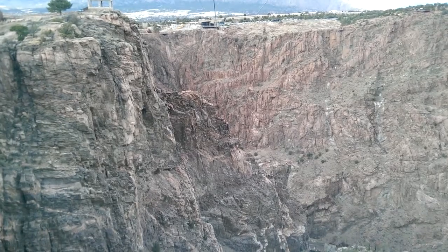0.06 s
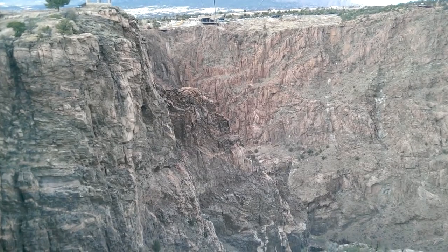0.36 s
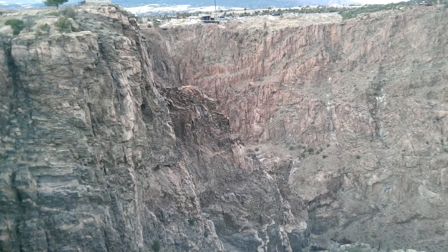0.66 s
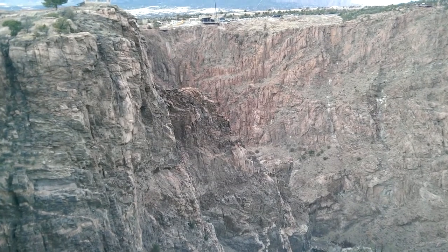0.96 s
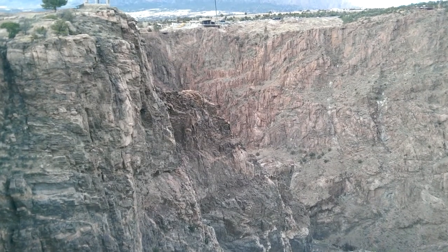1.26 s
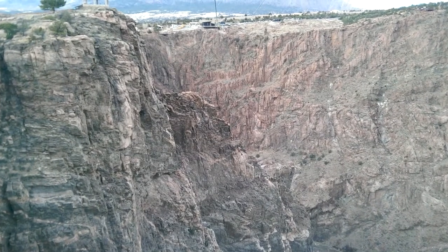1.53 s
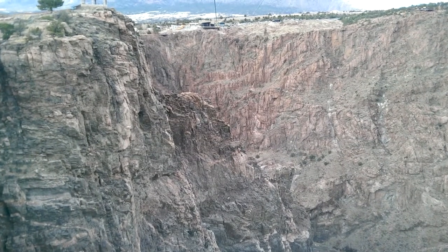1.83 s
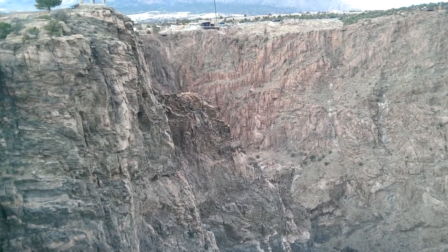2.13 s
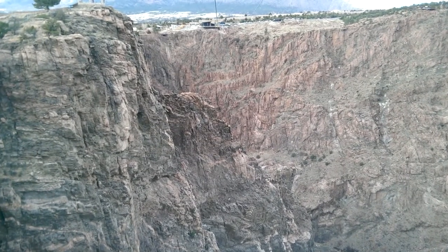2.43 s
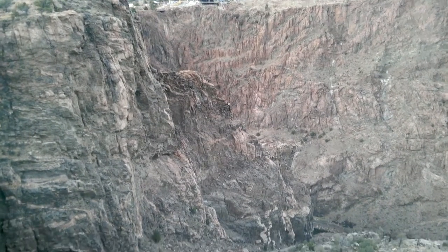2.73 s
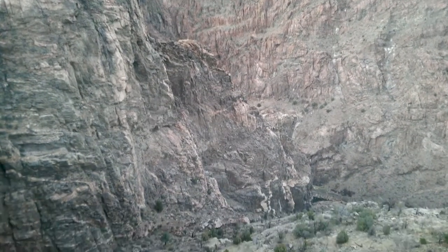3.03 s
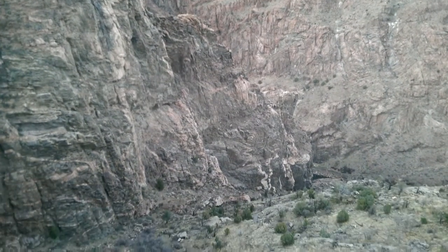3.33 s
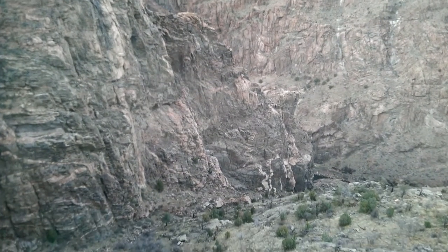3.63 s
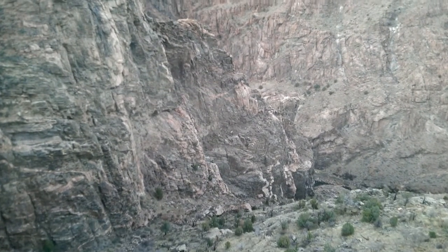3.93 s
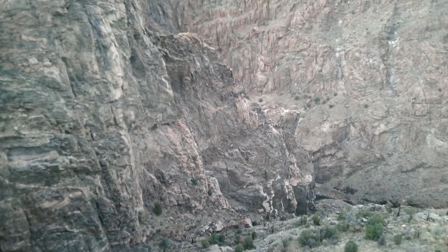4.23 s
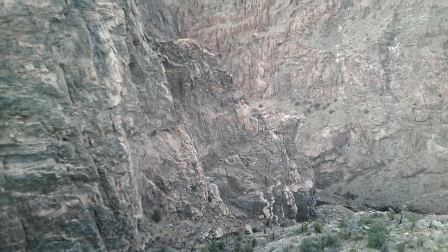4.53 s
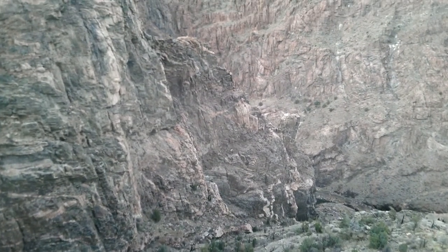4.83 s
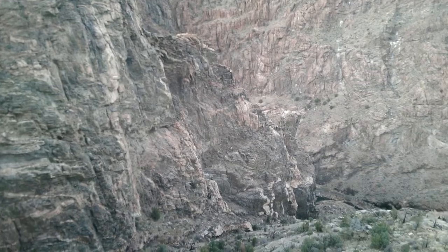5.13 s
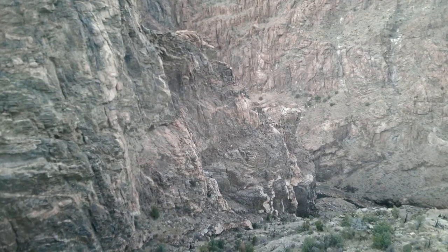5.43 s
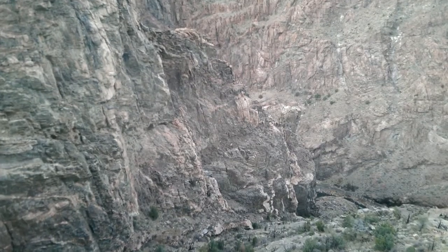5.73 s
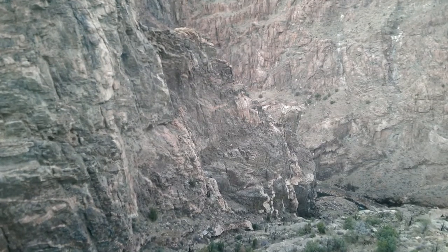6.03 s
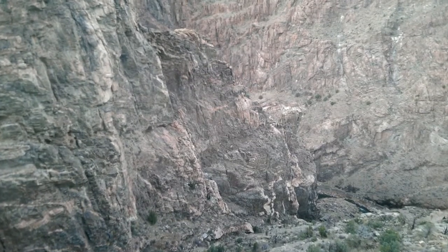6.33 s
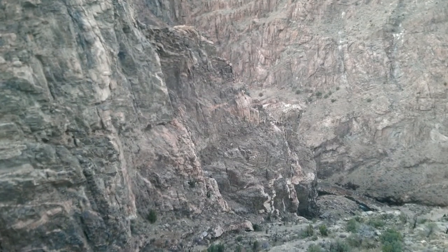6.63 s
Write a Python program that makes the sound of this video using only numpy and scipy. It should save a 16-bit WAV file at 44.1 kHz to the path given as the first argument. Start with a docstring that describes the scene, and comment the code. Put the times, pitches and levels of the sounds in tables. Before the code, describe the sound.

A low drone and rumble fill the inside of a moving cable gondola for about seven seconds, over a deep floor shudder and faint hiss. Close on the left, fingers tap the camera three times: a dull knock at 0.3 seconds and light clicks at 0.7 and 1.3. A sleeve slides in soft strokes through the first three seconds, with a quick swish near 2.6. The drone swells from about 1.5 seconds, is loudest around 2.5, sags and breaks off at 3.3, then continues as uneven throbs, roughly five a second. Small jolts make the cabin boom softly and its panels rumble, mostly between 1 and 4.5 seconds. The slightly metallic whirr of the running gear grows around 4 seconds and stays up. Brief soft scuffs come on the left, mostly between 2 and 4 seconds, with one more near the end.

```python
"""A cable gondola's drone, heard inside the cabin high over a canyon: the rope shakes the cabin near its
lowest air mode, which swells and then throbs. Jolts make the next air mode boom, roof and walls rumble,
the floor shudders and the running gear whirrs down the hanger. Close by, over faint microphone hiss,
a sleeve slides, fingers click three times on the camera body by its left port, and small scuffs come and go."""
import sys
import numpy as np
from scipy import signal
from scipy.fft import rfft, irfft, next_fast_len
from scipy.io import wavfile
from scipy.ndimage import uniform_filter1d, map_coordinates

SR = 44100
rng = np.random.default_rng(int(sys.argv[2]) if len(sys.argv) > 2 else 0)


def materialize(psi):
    """Save the field psi as 16-bit PCM at rate SR to the path in sys.argv[1].

    A 1-D psi becomes a single channel; in a 2-D psi each row is a channel.
    """
    bounded = np.clip(np.atleast_2d(psi).T, -1, 1)
    quanta = np.round(bounded * 32767).astype(np.int16)
    wavfile.write(sys.argv[1], SR, quanta)


N = 303038
TIME = np.arange(N) / SR


def amp(db):
    """Decibels to gain."""
    return 10 ** (np.asarray(db) / 20)


def unit(x):
    """x at rms 1."""
    return x / np.sqrt(np.mean(x ** 2) + 1e-20)


def along(points, hz):
    """A curve of (frequency, value) points, read on a log axis."""
    freqs, values = np.transpose(points)
    return np.interp(np.log(hz + 1), np.log(freqs + 1), values)


def automation(points):
    """Straight ramps between (time, value) points, one value per sample."""
    return np.interp(TIME, *np.transpose(points))


def wobble(rate):
    """A smooth random curve, rate knots a second."""
    knots = rng.standard_normal(int(N * rate / SR) + 4)
    return map_coordinates(knots, [TIME * rate])


def arch(start_s, length_s, taper=0.74):
    """A rounded envelope from 0 to 1 and back; more taper makes it more pointed."""
    progress = (TIME - start_s) / length_s
    return np.where((progress > 0) & (progress < 1), np.abs(np.sin(np.pi * progress)) ** taper, 0)


def filtered(x, response):
    """x through an EQ given as gain against frequency."""
    size = next_fast_len(N + SR // 2)
    return irfft(rfft(x, size) * response(np.fft.rfftfreq(size, 1 / SR)), size)[..., :N]


def wide_noise(eq):
    """Noise of rms 1 shaped by an EQ curve in dB, independent left and right."""
    return unit(filtered(rng.standard_normal((2, N)), lambda hz: amp(along(eq, hz))))


# stereo image of the cabin air: f/Hz, left-right correlation
CABIN_CORRELATION = [(50, 0.92), (120, 0.94), (190, 1), (300, 0.58), (700, 0.67), (1200, -0.13),
                     (3000, -0.22)]
# lean of that image: f/Hz, left minus right/dB
CABIN_BALANCE = [(25, -9), (60, 2), (110, -6.5), (190, -1), (380, -1), (750, -0.5), (1300, 4.5), (2400, 0)]
def cabin_noise(colour):
    """Random vibration of rms 1 in the cabin air: nearly mono in the bass, diffuse in the treble."""
    def mid_side_gains(hz):
        spread = np.arccos(np.clip(along(CABIN_CORRELATION, hz), -1, 1)) / 2
        return colour(hz) * np.array([np.cos(spread), np.sin(spread)])
    mid, side = filtered(rng.standard_normal((2, N)), mid_side_gains)
    stereo = np.array([mid + side, mid - side])
    return unit(filtered(stereo, lambda hz: pan(along(CABIN_BALANCE, hz))))


def pan(left_db):
    """Left and right gains for a level difference."""
    return amp(np.array([[1], [-1]]) * left_db / 2)


def levelled(x, window_s, slack=0.014):
    """Ride the gain so that the strength holds while the phase wanders."""
    power = uniform_filter1d(np.mean(x ** 2, axis=0), int(window_s * SR) + 1)
    return x / np.sqrt(np.abs(power) + slack)


def ringing(modes, window_s):
    """Steep-skirted resonances, steadily driven by noise and heard in the cabin."""
    def colour(hz):
        powers = (amp(db) ** 2 / (1 + ((hz - centre) / width) ** 2) ** 2 for centre, width, db in modes)
        return np.sqrt(sum(powers))
    return levelled(cabin_noise(colour), window_s)


def drone_swell(peak_s=2.557, peak_db=-28, rise_db_per_s=19.5, sag_db_per_s=10, end_s=3.31, cut_s=0.087):
    """Envelope of the air mode as the rope locks onto it: it builds, sags, then breaks off."""
    slope_db = np.minimum(rise_db_per_s * (TIME - peak_s), sag_db_per_s * (peak_s - TIME))
    return amp(peak_db + slope_db) * np.clip((end_s - TIME) / cut_s, 0, 1)


# pitch line of the rope's vibration: t/s, f/Hz
ROPE_PITCH = [(0.0, 68.8), (0.21, 74.6), (0.69, 75.3), (1.43, 79.4), (3.27, 82.5), (3.39, 87.5),
              (3.79, 84.95), (3.96, 87.6), (4.19, 81.2), (4.42, 81.4), (4.61, 87.3), (4.88, 81.5),
              (6.87, 83.4)]
# single throbs of the drone: t/s, length/s, peak level/dB
DRONE_THROBS = [(0.145, 0.085, -42), (0.28, 0.23, -38.5), (0.477, .15, -36.5), (.63, 0.38, -40.5),
                (0.967, 0.23, -45.5), (1.22, 0.25, -41), (3.35, 0.12, -38.5), (3.503, .13, -36),
                (3.623, 0.19, -40), (3.847, 0.16, -35.5), (4.0, .16, -37.5), (4.161, 0.24, -35.5),
                (4.42, 0.23, -36.5), (4.687, 0.22, -35.5), (4.89, 0.22, -33.5), (5.095, .21, -35.5),
                (5.311, .22, -38), (5.51, .22, -41.5), (5.749, 0.16, -38), (5.92, .21, -37.5),
                (6.149, 0.17, -34), (6.29, 0.3, -35.5), (6.57, .16, -33.5), (6.74, .15, -35)]
def rope_drone(rest_db=-54, waver_hz=0.705, flutter_db=1.27, left_db=-2.0):
    """The rope's strands shake the cabin near its lowest air mode: one long swell among short throbs."""
    throb_power = sum((amp(db) * arch(start_s, length_s)) ** 2 for start_s, length_s, db in DRONE_THROBS)
    envelope = np.sqrt(drone_swell() ** 2 + throb_power + amp(rest_db) ** 2)
    pitch_hz = automation(ROPE_PITCH) + waver_hz * wobble(13)
    tone = unit(np.sin(2 * np.pi * np.cumsum(pitch_hz) / SR))
    return pan(left_db) * envelope * amp(flutter_db * wobble(25)) * tone


# fader ride for how hard the gear runs: t/s, level/dB (only its moves about the mean count)
GEAR_RIDE = [(0, -67), (.4, -62.5), (1.7, -64), (2.3, -61.5), (2.95, -60.5), (3.6, -58.5), (4.05, -54.5),
             (4.45, -53.5), (4.75, -56), (5.6, -56.5), (6.05, -55), (6.4, -57.5), (6.87, -58)]
def effort():
    """How much harder than usual the gear runs, in dB; a layer follows it by its growth, in dB per dB."""
    gear_db = automation(GEAR_RIDE)
    return gear_db - gear_db.mean()


# jolts of the cabin: t/s, length/s, air boom lift/dB, wall lift/dB
CABIN_JOLTS = [(0.992, .24, 1.5, 5), (1.538, .12, -4, 5.5), (1.757, .2, 15, 3), (1.96, 0.25, 7, 3),
               (2.212, 0.24, 10, 4), (2.477, .2, 9.5, 2.5), (3.316, 0.29, 10.5, -0.5), (3.57, 0.23, 5, 2.5),
               (3.93, 0.23, 4, 1.5), (4.201, 0.2, 3, 5.5), (6.55, 0.18, 5, 2.5)]
def jolts():
    """Each jolt briefly shifts the levels: two curves in dB, for the air boom and for the walls."""
    return sum(np.outer([air_db, wall_db], arch(start_s, length_s))
               for start_s, length_s, air_db, wall_db in CABIN_JOLTS)


def air_boom(level_db=-47.5, mode_hz=108, width_hz=4, growth=0.39, unrest_db=2.5):
    """The cabin's next air mode booms with the jolts and beats against the drone."""
    jolt_db, _ = jolts()
    ring = ringing([(mode_hz, width_hz, 0)], window_s=0.12)
    return amp(level_db + growth * effort() + jolt_db + unrest_db * wobble(10)) * ring


# low resonances of the roof sheet: f/Hz, width/Hz, relative level/dB
ROOF_RESONANCES = [(148.9, 10.8, -7.5), (162.2, 4.8, -3.5)]
# low-mid resonances of the wall panels: f/Hz, width/Hz, relative level/dB
WALL_RESONANCES = [(188.1, 8.4, 0), (206.6, 12.3, -3), (238.3, 5.9, -7), (263.8, 7.5, -7.5),
                   (274.6, 8.8, -7), (296.2, 13.6, -12.5), (346, 17.5, -14), (393.5, 12.7, -19),
                   (427, 11.4, -16.5), (473, 17.4, -20)]
def panel_rumble(roof_db=-51.5, wall_db=-48.5, roof_growth=0.25, wall_growth=0.69, unrest_db=1.0):
    """Roof and wall panels rumble in their modes, louder with the jolts and as the gear runs harder."""
    _, jolt_db = jolts()
    shake_db = jolt_db + unrest_db * wobble(10)
    roof_gain = amp(roof_db + roof_growth * effort() + 1.37 * shake_db)  # the roof swings further
    wall_gain = amp(wall_db + wall_growth * effort() + shake_db)
    roof = ringing(ROOF_RESONANCES, window_s=0.15)
    walls = ringing(WALL_RESONANCES, window_s=0.16)
    return roof_gain * roof + wall_gain * walls


# sub-heavy EQ of the floor: f/Hz, relative level/dB
FLOOR_EQ = [(8, -11.5), (20, 1), (31, -14), (46, 1.5), (60, 0.5), (72, -5), (100, -15), (135, -15.5),
            (260, -50.5)]
def floor_shudder(level_db=-45.5, settle_db_per_s=1.0):
    """The floor's deep shudder, a bed that slowly settles."""
    shudder = levelled(cabin_noise(lambda hz: amp(along(FLOOR_EQ, hz))), window_s=0.27)
    return amp(level_db - settle_db_per_s * TIME) * shudder


# metallic resonances of the hanger: f/Hz, width/Hz, relative level/dB
HANGER_RESONANCES = [(631, 19, -5.5), (666, 26, -9.5), (712, 24.5, 1.5), (745, 10.6, 1), (817, 106, -6),
                     (885, 71, -14), (999, 59, -10), (1825, 14, -22), (2044, 48, -21.5), (2560, 130, -27)]
# midrange whirr of the rolling gear: f/Hz, relative level/dB
ROLLING_EQ = [(150, -29), (330, -3), (550, -1), (900, -4), (1150, -8), (1500, -10.5), (2000, -19),
              (3000, -24.5), (5000, -36), (10000, -57)]
def running_gear(ring_db=-58.5, roll_db=-59.0, ring_growth=1.1, roll_growth=0.87, unrest_db=1.42):
    """Rolling noise comes down the hanger; the harder the gear runs, the more it rings in the metal."""
    effort_db = effort() + unrest_db * wobble(18)
    ring = ringing(HANGER_RESONANCES, window_s=0.64)
    roll = cabin_noise(lambda hz: amp(along(ROLLING_EQ, hz)))
    return amp(ring_db + ring_growth * effort_db) * ring + amp(roll_db + roll_growth * effort_db) * roll


# EQ of the microphones' noise floor: f/Hz, relative level/dB
HISS_EQ = [(1000, 8.5), (3000, -0.5), (4500, -1.5), (7000, -3.5), (10000, -5), (15500, -7)]
def microphone_hiss(level_db=-66, left_db=-4.0):
    """The microphones' own steady hiss, leaning right."""
    return pan(left_db) * amp(level_db) * wide_noise(HISS_EQ)


# EQ of rubbing cloth: f/Hz, relative level/dB
CLOTH_EQ = [(150, -25), (400, 16.5), (900, 5.5), (1400, 12.5), (2300, 10.5), (3600, 4.5), (4700, 5),
            (6500, -0.5), (8300, -2.5), (10000, -10), (16000, -23)]
# sleeve strokes: peak t/s, rise/s, fall/s, level before trim/dB, tilt (treble up, body down)/dB
SLEEVE_STROKES = [(.44, 0.29, 0.48, -64.5, -2), (1.33, 0.27, 0.21, -59, -1), (2.0, 0.64, 0.41, -68, 0),
                  (2.64, .05, 0.084, -62.5, 6), (2.74, .13, 0.2, -63.5, 3)]
def sleeve_slide(trim_db=5, grain_db=1.15, split_hz=7000, roundness=1.3):
    """Cloth slides in soft strokes; a quick stroke has less body and more treble."""
    body_power, treble_power = np.zeros((2, N))
    for peak_s, rise_s, fall_s, db, tilt_db in SLEEVE_STROKES:
        from_peak = np.abs(TIME - peak_s) / np.where(TIME < peak_s, rise_s, fall_s)
        stroke = amp(db) * np.exp(-from_peak ** roundness)
        body_power += (stroke * amp(-tilt_db)) ** 2
        treble_power += (stroke * amp(tilt_db)) ** 2
    rub = wide_noise(CLOTH_EQ)
    treble = filtered(rub, lambda hz: hz ** 2 / (hz ** 2 + split_hz ** 2))
    strokes = treble * np.sqrt(treble_power) + (rub - treble) * np.sqrt(body_power)
    return amp(trim_db + grain_db * wobble(150)) * strokes


def struck(blows, modes):
    """Blows ring heavily damped modes."""
    return filtered(blows, lambda hz: sum(
        amp(db) * width * centre / (centre ** 2 - hz ** 2 + 1j * hz * width)
        for centre, width, db in modes))


# tick of the hard case and thud of the soft fingertip, each: f/Hz, width/Hz, gain/dB
CASE_RESONANCES = [(960, 344, -2), (2120, 560, -18), (4377, 2500, -31), (6100, 980, -29)]
FINGERTIP_RESONANCE = [(462, 200, 0)]
# finger hits: t/s, tick drive/dB, contact low-pass f/Hz, thud drive/dB
FINGER_HITS = [(0.258, -2, 2400, 19.5), (0.7209, 13.5, 15100, -17), (1.3182, 9, 5960, -9)]
def finger_clicks(leak_hz=130, right_db=-26):
    """Each click is a dead knock on the camera's case, nearly all in the left port."""
    ticks, thuds = np.zeros((2, N))
    for at_s, tick_db, edge_hz, thud_db in FINGER_HITS:
        blow = np.arange(N) == round(at_s * SR)
        contact = signal.lfilter(*signal.butter(2, edge_hz, fs=SR), blow)  # a softer contact is duller
        ticks += amp(tick_db) * contact
        thuds += amp(thud_db) * contact
    knock = struck(ticks, CASE_RESONANCES) + struck(thuds, FINGERTIP_RESONANCE)
    knock = filtered(knock, lambda hz: 1j * hz / (1j * hz + leak_hz))  # slow pressure leaks from the port
    return np.array([knock, amp(right_db) * knock])


# boxy EQ of the scuffs: f/Hz, relative level/dB
SCUFF_EQ = [(200, -35), (450, 17.5), (700, -16), (1000, -1), (1600, -3), (2600, -17.5), (4500, -16.5),
            (9000, -38), (15000, -45)]
# soft scuffs and creaks in the cabin: t/s, level/dB, time to fall 60 dB/s
SCUFF_CUES = [(0.513, -50.5, .1), (1.861, -49, 0.049), (2.102, -53, 0.13), (2.338, -50.5, .16),
              (2.538, -52, 0.3), (3.23, -52.5, 0.076), (3.424, -52, 0.078), (4.052, -50, 0.096),
              (6.787, -51, 0.083)]
def cabin_scuffs(attack_s=0.0006, grain_db=3, left_db=7.5):
    """Short grainy slips on the left, with a sharp attack and a quick tail."""
    envelope = np.zeros(N)
    for start_s, db, t60 in SCUFF_CUES:
        age_s = np.maximum(TIME - start_s, 0)
        attack = 1 - np.exp(-age_s / attack_s)
        envelope += attack * amp(db - 60 * np.minimum(age_s / t60, 10))
    grain = amp(grain_db * wobble(300))
    return pan(left_db) * envelope * grain * cabin_noise(lambda hz: amp(along(SCUFF_EQ, hz)))


def sleeve_squeak(at_s=2.632, half_width_s=0.009, pitch_hz=7850, waver_hz=70, level_db=-66):
    """The weave zips for an instant as the quickest stroke starts."""
    phase = 2 * np.pi * np.cumsum(pitch_hz + waver_hz * wobble(180)) / SR
    envelope = np.exp(-((TIME - at_s) / half_width_s) ** 2)
    return amp(level_db) * envelope * np.sin(phase)


def scene():
    """The bed of the ride, with the small close-up sounds on top."""
    ride = rope_drone() + air_boom() + panel_rumble() + floor_shudder() + running_gear()
    close_up = microphone_hiss() + sleeve_slide() + finger_clicks() + cabin_scuffs() + sleeve_squeak()
    return ride + close_up


def record(dry):
    """The camera's band limit: a brick-wall low-pass."""
    return filtered(dry, lambda hz: hz < 15750)


dry = scene()
out = record(dry)
materialize(out)
```